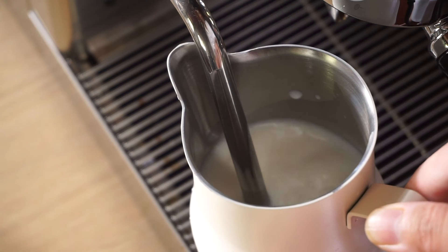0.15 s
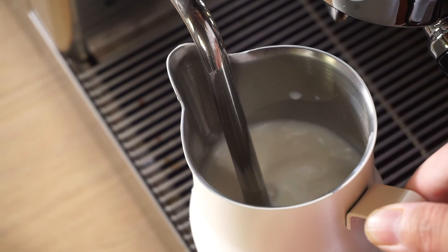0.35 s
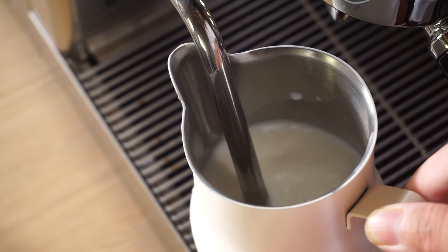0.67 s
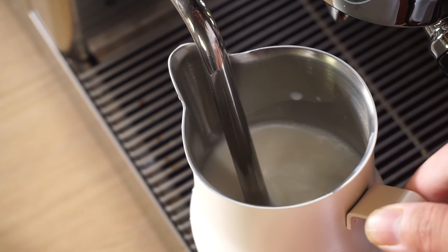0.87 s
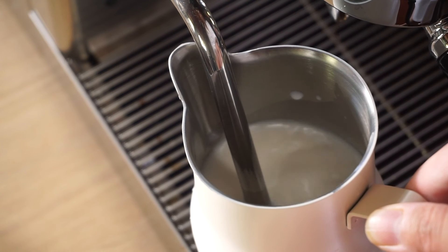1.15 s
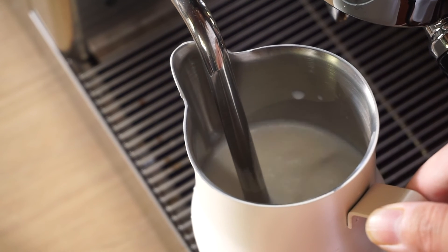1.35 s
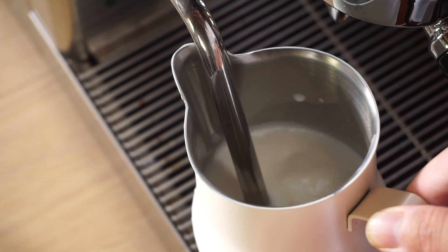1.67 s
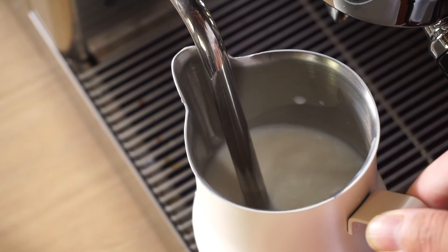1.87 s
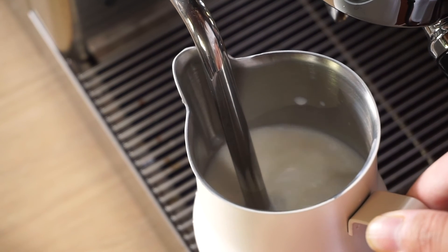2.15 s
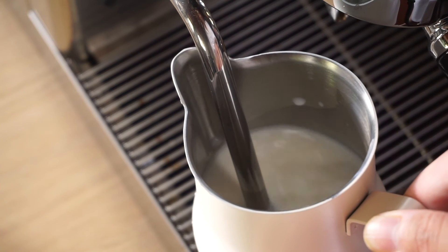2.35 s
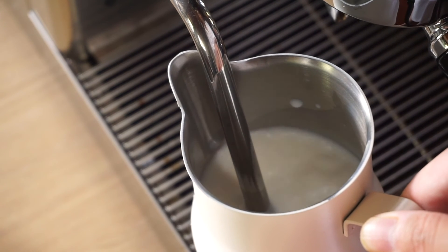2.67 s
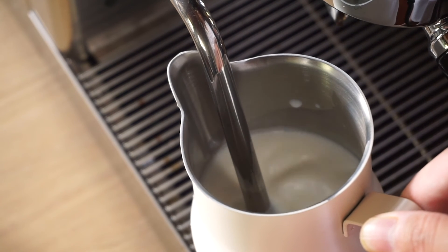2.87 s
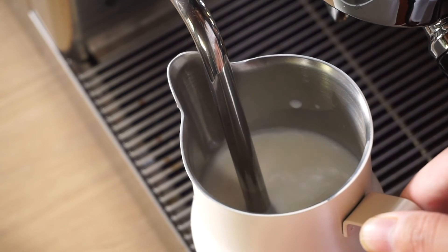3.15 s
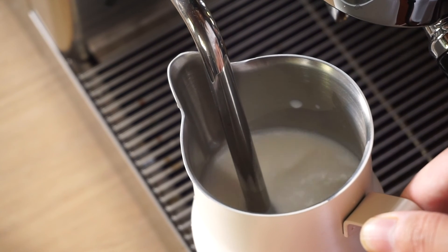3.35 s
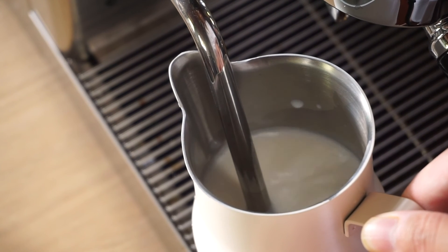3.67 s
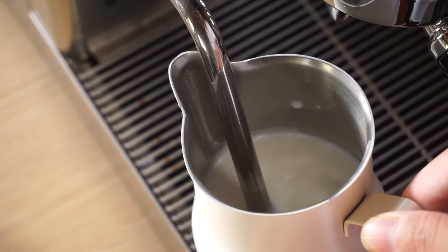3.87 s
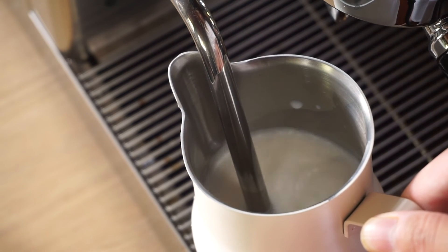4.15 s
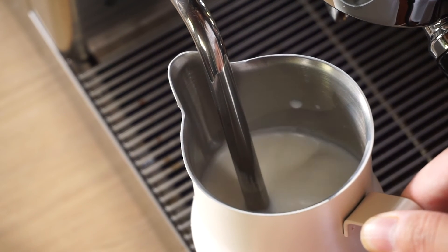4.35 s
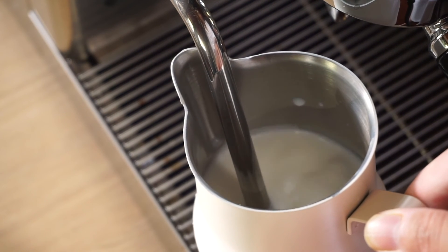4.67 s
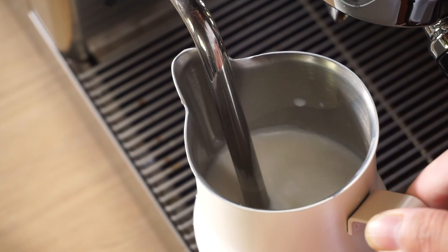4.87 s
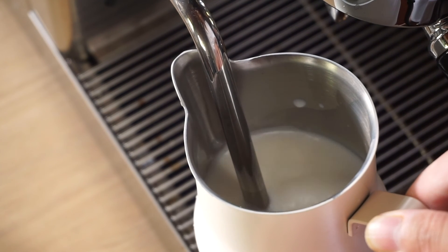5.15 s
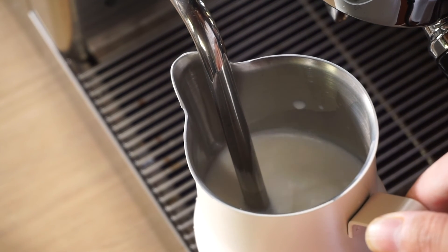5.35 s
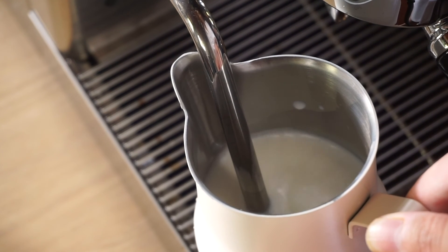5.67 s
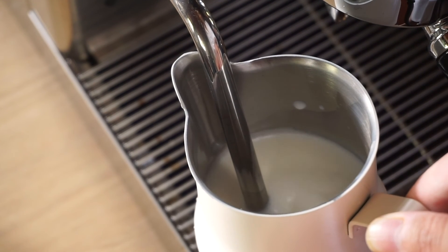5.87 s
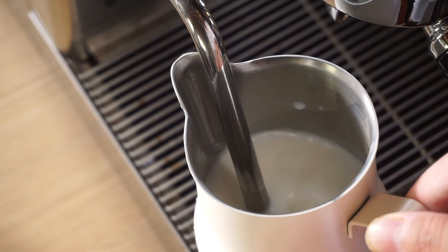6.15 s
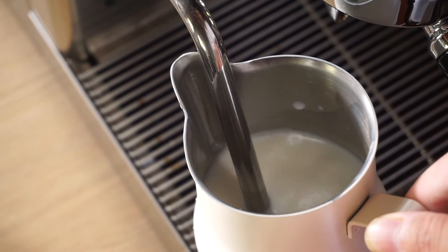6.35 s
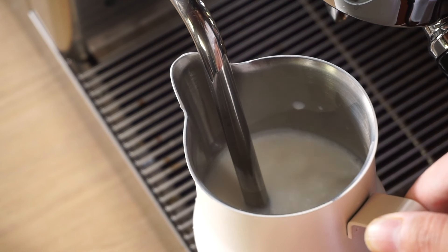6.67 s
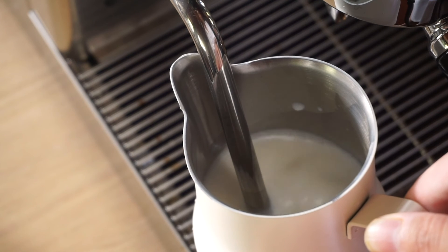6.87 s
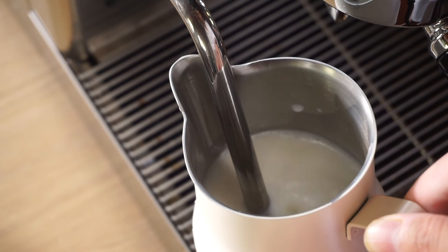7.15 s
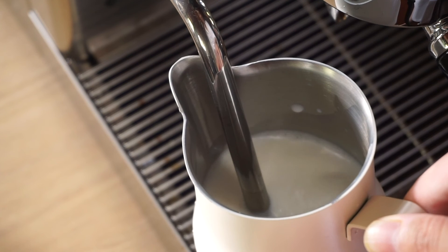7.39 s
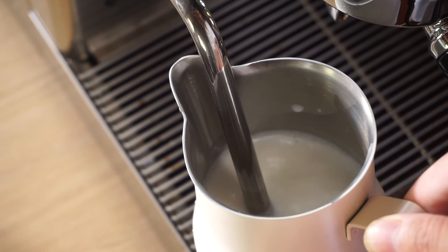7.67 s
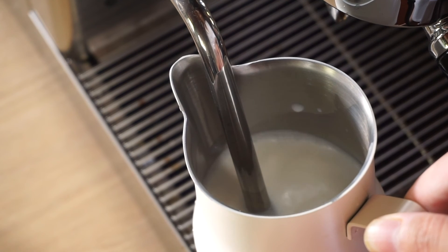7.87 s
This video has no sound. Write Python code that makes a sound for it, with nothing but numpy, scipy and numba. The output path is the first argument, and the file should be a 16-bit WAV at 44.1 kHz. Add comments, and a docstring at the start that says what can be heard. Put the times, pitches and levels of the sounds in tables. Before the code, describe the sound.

Close-up milk steaming: bright flickering hiss over a rough midrange roar, occasional bubbly gulps and pops, then sputtering spits as the jet quietens.

```python
"""In a small kitchen, a steam wand blasts into milk in a steel pitcher, close to a stereo microphone.
Noise grains for collapsing steam bubbles feed a broad roaring band and ring the milk and the pitcher;
the nozzle hisses above in flickering bands of noise. Now and then the tip gulps air (gliding sines) or
spits at the surface (choked bursts of bright noise); late on, foam lowers the milk's tones."""
import sys
import numpy as np
from scipy import signal
from scipy.fft import rfft, irfft, next_fast_len
from scipy.io import wavfile
from numba import njit

SR = 44100
rng = np.random.default_rng(int(sys.argv[2]) if len(sys.argv) > 2 else 0)


def put_to_file(sound):
    """Save the sound as 16-bit audio at rate SR, in the file named by the first command-line argument."""
    columns = np.atleast_2d(sound).T  # one column per channel
    safe = np.clip(columns, -1, 1)
    whole_steps = np.round(safe * 32767)
    wavfile.write(sys.argv[1], SR, whole_steps.astype(np.int16))


N = 353682

# kitchen and microphone floor, spectral shape: f/Hz, level/dB
FLOOR_SHAPE = [(24, -51.5), (483, -21.5), (700, -15.5), (1100, -16), (2640, -120)]
FLOOR_DB = -77.5
# stereo lean over frequency: f/Hz, left minus right/dB
STEREO_LEAN = [(600, 9), (1100, -7.5), (3500, -5), (6000, -0.5), (11000, -3.5)]
ROOM_T60_S, ROOM_DB = 0.081, 2.5
CUTOFF_HZ = 11150

# a patch of the hiss flares up: t/s, f/Hz, level/dB
HISS_FLARES = [(2.51, 5470, -44), (3.538, 7300, -38.5)]
FLARE_S, FLARE_WIDTH = 0.023, 0.45   # time from the top down to 1/e; width as a share of the pitch
# the tip spits at the surface: t/s, burst level/dB, ring level/dB
SURFACE_SPITS = [(4.556, -11.5, -30), (6.111, -17.5, -35), (6.141, -12.5, -43), (6.181, -10.5, -51),
                 (6.2116, -22, -35), (6.2372, -25, -46), (6.2635, -27, -61), (6.292, -26.5, -35),
                 (7.003, -26, -22.5), (7.025, -20.5, -30.5), (7.222, -20.5, -13.5), (7.235, -19, -29),
                 (7.256, -15, -39), (7.372, -19, -33)]
SPRAY_DB, SPRAY_S = -35, 0.05   # fizz that lingers after a spit: level against the spit, decay to 1/e
# pitcher modes: f/Hz, width/Hz, level/dB against their drive, share driven by the roar
PITCHER_MODES = [(4520, 560, -9.5, .9), (5785, 630, -13.5, 0.3), (6540, 370, -14, 0.29),
                 (3535, 240, -17, 0.33)]
# nozzle hiss, spectral shape: f/Hz, level/dB
HISS_SHAPE = [(3000, -45.5), (3900, -13.5), (5200, -6), (6500, -4.5), (8000, -1), (8500, -4), (10300, -2.5),
              (11500, -14)]

# states of the froth; each sets the milk's pitches anew, and they climb as the air mixes in:
# t/s, low f/Hz, middle f/Hz, upper f/Hz, faint f/Hz, climb/(share per s), low level/dB,
# faint level/dB against the upper, low width/(share of its pitch), change in the first pitcher mode/dB
FROTH_STATES = [(0.0, 761.3, 1575, 2383, 1370, 0.089, -71.5, -10.5, 0.14, -5),
                (2.436, 759, 1672, 2510, 1270, 0.25, -70, -22.5, 0.21, -19),
                (2.786, 754, 1644, 2565, 1320, 0.14, -76, -25, 0.27, -12.5),
                (3.411, 732.3, 1390, 2320, 1258, 0.069, -74, -20.5, 0.14, -13.5),
                (4.694, 748, 1450, 2440, 1310, 0.09, -73.5, -23.5, 0.13, -12.5),
                (6.2, 548.4, 1001, 2126, 1550, 0.0027, -81, -15, 0.29, -7)]
# how much of the climb each resonance takes: low, middle, upper, faint [share]
CLIMB_BY_TONE = (0.21, 0.96, 0.35, 0.55)
# resonance widths: middle, upper, faint [share of the pitch]
UPPER_WIDTHS = (0.23, 0.41, 0.4)
# how loud two of the resonances sing: t/s, middle level/dB, upper level/dB
SINGING = [(0.0, -65, -61.5), (1.46, -58, -64.5), (2.5, -55.5, -52), (3.5, -62, -49), (3.8, -61.5, -49),
           (4.2, -58, -55), (5.55, -69, -51.5), (5.77, -48.5, -49), (6.17, -62, -54.5), (6.3, -57, -81),
           (6.41, -85, -69), (6.5, -59, -59), (6.66, -48, -57.5), (6.95, -61.5, -51.5), (7.28, -51, -51.5),
           (7.45, -64, -47.5), (8.02, -60, -41.5)]
# narrow whistle at the heart of each resonance: low, middle, upper, faint [strength]
WHISTLE_GAINS = (0.18, 0.52, 0.25, 0.061)
WHISTLE_WIDTH = 0.22   # share of the resonance's width
UPPER_FOLLOWS = 0.77   # share of a surge's swell
# the tip gulps air: t/s, bubble level/dB, bubble f/Hz, low tone level/dB, tone hold/s
AIR_GULPS = [(0.0852, -30.5, 1860, -75, 0.029), (0.2693, -30, 1607, -39, 0.011),
             (1.9989, -31.5, 1823, -42.5, 0.031), (2.2498, -20.5, 1904, -32.5, 0.044),
             (2.2837, -21, 1835, -66, 0.033), (2.4364, -36.5, 1640, -56.5, 0.026),
             (2.4728, -37, 2300, -61, 0.0099), (2.7836, -33.5, 1640, -56, 0.023),
             (3.4103, -29, 1010, -50, 0.013), (3.4131, -27.5, 1700, -49, 0.093),
             (3.433, -30.5, 1275, -51, 0.0096), (3.602, -44, 1440, -49, 0.047),
             (3.635, -39, 2260, -49, 0.056), (3.7219, -28.5, 1430, -49.5, 0.074),
             (3.7554, -18.5, 2250, -55, 0.011), (4.69, -41, 1464, -61, 0.029),
             (4.696, -20.5, 2320, -70, 0.02), (6.2203, -38, 942, -58, 0.034), (6.27, -49, 886, -76, 0.026),
             (6.5809, -40.5, 1095, -67, 0.012), (7.0204, -36, 954, -43.5, 0.026),
             (7.2294, -32, 970, -44.5, 0.024), (7.2814, -32.5, 944, -49, 0.042)]
STIR_DB, STIR_T60_S = -33, 0.57   # the low resonance sings on after a gulp, this far under its tone
TONE_CHOKE_S = 0.02   # froth chokes a gulp's low tone to 1/e in this time
CLEAR_SHARE = 0.26   # the low tone blurs once its resonance is wider than half this share of its pitch
CRACKLE_CYCLES = 36   # small bubbles fall 60 dB within this many cycles of the big one

# the jet between surges: t/s, roar level/dB, roar centre f/Hz, hiss level/dB
STEADY_JET = [(0.0, -39.5, 2804, -42), (1.8, -43, 2908, -38.5), (2.2, -48.5, 2885, -39.5),
              (2.34, -38.5, 3164, -42.5), (2.51, -39.5, 2635, -38.5), (2.67, -38, 2980, -40.5),
              (2.87, -45.5, 2870, -43), (3.15, -35, 2680, -40), (3.45, -46.5, 2910, -40),
              (3.82, -38, 2763, -42.5), (4.3, -40.5, 2750, -39.5), (4.6, -40.5, 2880, -43),
              (5.65, -38, 2780, -39), (5.92, -39.5, 2970, -40.5), (6.14, -47, 2820, -36.5),
              (6.33, -55.5, 2760, -44), (6.55, -50, 2944, -55), (7.1, -50.5, 2870, -52.5),
              (7.6, -47, 2860, -48.5), (8.02, -41, 3050, -47.5)]
# the jet surges: t/s, length/s, swell/dB, roar centre f/Hz
JET_SURGES = [(1.676, 0.03, 6.5, 2850), (1.999, 0.064, 17.5, 3190), (3.33, 0.014, 4, 2910),
              (3.536, 0.04, 6.5, 2770), (3.966, 0.014, 8, 2800), (4.175, 0.021, 7.5, 2610),
              (4.288, 0.036, 8.5, 2705), (5.738, 0.17, 3, 3036), (6.683, 0.028, 6.5, 2780),
              (7.151, 0.021, 20.5, 2830), (7.199, 0.043, 19.5, 2890), (7.82, 0.022, 5, 3100)]
SURGE_RISE_S, SURGE_FALL_S = 0.025, 0.017
ROAR_WIDTH_HZ = 887
# the loudest single collapses in the roar: t/s, level/dB
LOUD_COLLAPSES = [(0.045, -22), (2.761, -17.5), (3.047, -22), (3.142, -22), (3.562, -15), (3.719, -18),
                  (3.958, -18), (4.166, -14.5), (4.2925, -13.5), (4.638, -19), (5.716, -15.5), (5.813, -16),
                  (7.206, -25)]


def from_db(db):
    """Decibels to gain."""
    return 10 ** (np.asarray(db) / 20)


def rms_one(x):
    """Scales to rms 1."""
    return x / np.sqrt(np.mean(x ** 2) + 1e-20)


def in_time(rows):
    """Table columns as curves, sample by sample."""
    s, *columns = np.transpose(rows)
    return [np.interp(np.arange(N) / SR, s, c) for c in columns]


def coloured(x, points, share=1):
    """Shapes a sound by f/Hz, level/dB points, joined on a logarithmic pitch scale."""
    size = next_fast_len(N)
    hz = np.maximum(np.arange(size // 2 + 1) * SR / size, 1)
    point_hz, point_db = np.transpose(points)
    db = np.interp(np.log(hz), np.log(np.maximum(point_hz, 1)), point_db)
    return irfft(rfft(x, size) * from_db(share * db), size)[..., :N]


def drift(rate_hz):
    """Slow random wander of rms 1: noise through two equal low-passes."""
    r = np.exp(-2 * np.pi * rate_hz / SR)
    wander = signal.lfilter([1], [1, -2 * r, r * r], rng.standard_normal(N + SR))
    return rms_one(wander[SR:])   # skips the filter's start


@njit
def moving_pole(x, c, r):
    """Two-pole resonance whose centre and width move."""
    y = np.zeros(len(x))
    for i in range(2, len(x)):
        drive = (1 - r[i] * r[i]) / 2 * (x[i] - x[i - 2])
        y[i] = drive + 2 * r[i] * c[i] * y[i - 1] - r[i] * r[i] * y[i - 2]
    return y


def resonance(x, hz, width_hz):
    """Gain 1 on top; three passes of the stated width leave dark valleys."""
    c = np.cos(2 * np.pi * hz / SR) + np.zeros(N)
    r = np.exp(-np.pi * width_hz / SR) + np.zeros(N)
    for _ in range(3):
        x = moving_pole(x, c, r)
    return x


def collapses(per_s, spread_db, clump_db, smooth):
    """Random bubble collapses of uneven size, in clumps, over smooth turbulence; rms 1."""
    sizes = from_db(spread_db * np.minimum(rng.exponential(1, N), 5)) * rng.choice([-1, 1], N)
    grains = rms_one(sizes * (rng.random(N) < per_s / SR))
    clumps = from_db(clump_db * (drift(19.0) + drift(36)))
    return rms_one((grains + smooth * rng.standard_normal(N)) * clumps)


def ping(hz, t60, glide, t, rise=0.00025):
    """A collapsing bubble: a quickly swelling, dying sine; a positive glide raises its pitch."""
    t = np.maximum(t, 0)
    sine = np.sin(2 * np.pi * hz * t * (1 + glide * t))
    return sine * from_db(-60 * t / t60) * (1 - np.exp(-(t / rise) ** 2))


def background_floor():
    """Faint kitchen and microphone noise: partly shared by both channels, partly opposed."""
    common, apart = rng.standard_normal((2, N))
    noise = common + 1.14 * apart * [[1], [-1]]
    return from_db(FLOOR_DB) * rms_one(coloured(noise, FLOOR_SHAPE) * from_db(3.1 * drift(7.6)))


def kitchen(x):
    """Steel, worktop and walls send back a short, bright tail, unlike in each channel."""
    t = np.arange(int(.3 * SR)) / SR
    bright = signal.lfilter([1, -0.7], [1], rng.standard_normal((2, len(t))))
    tail = bright * from_db(-60 * t / ROOM_T60_S)
    tail = tail / np.sqrt(np.sum(tail ** 2, axis=1, keepdims=True))
    return signal.fftconvolve(x[None], tail, axes=1)[:, :N]


def flares():
    """Short swells of noise, each in a band of its own."""
    s, hz, db = np.transpose(HISS_FLARES)
    t = np.arange(N) / SR
    k = np.searchsorted((s[1:] + s[:-1]) / 2, t)   # nearest flare
    band = rms_one(resonance(collapses(6000, 2.0, 0.67, smooth=2.7), hz[k], FLARE_WIDTH * hz[k]))
    return from_db(db[k]) * np.exp(-((t - s[k]) / FLARE_S) ** 2) * band


def spits():
    """Each spit swells for some milliseconds and is choked off; it also shakes a pitcher mode."""
    bright, ring, t = np.zeros(N), np.zeros(N), np.arange(N) / SR
    for s, db, ring_db in SURFACE_SPITS:
        late = t - s - .003   # from the top of the spit
        bright += from_db(db - 12) * np.exp(np.where(late < 0, late / 0.0076, -late / 0.00051))
        bright += from_db(db + SPRAY_DB) * (late > 0) * np.exp(-np.abs(late) / SPRAY_S)
        ring += from_db(ring_db - 13.5) * np.exp(np.where(late < 0, late / 0.0013, -late / 0.018))
    drive = collapses(4700, 2.5, 1.5, smooth=0.73)
    burst = bright * rms_one(resonance(drive, 8920, 3400))
    return burst + ring * rms_one(resonance(drive, PITCHER_MODES[1][0], 500))


def froth():
    """The froth table's columns, sample by sample; the first is the time since the state began."""
    t, rows = np.arange(N) / SR, np.array(FROTH_STATES)
    s, *columns = rows[np.maximum(np.searchsorted(rows[:, 0], t) - 1, 0)].T
    return [t - s] + columns


def pitcher_ring(hiss_db, roar_db):
    """Modes rung by collapses, following hiss and roar; each froth state sets the first, near 4.5 kHz."""
    out, drive = 0, collapses(4300, 6.3, 1.1, smooth=1.0)
    changes_db = [froth()[-1], 0, 0, 0]
    for (hz, width_hz, db, share), change_db in zip(PITCHER_MODES, changes_db):
        ring = rms_one(resonance(drive, hz * from_db(0.12 * drift(4.0)), width_hz))
        driven_db = (1 - share) * hiss_db + share * roar_db
        out = out + from_db(db + change_db + driven_db + 2.4 * drift(3.5)) * ring
    return out


def hiss(level_db):
    """Nozzle hiss: noise in patches that flicker band by band, duller when weak."""
    out, edges = 0, np.geomspace(3500, 12500, 8)
    for low, high in zip(edges, edges[1:]):
        band = signal.butter(2, [low, high], "band", fs=SR, output="sos")
        tilt_db = 0.91 * np.minimum(level_db + 42.5, 0) * np.log2(low / 7000)
        flicker_db = 0.66 * drift(2.47) + 1.42 * drift(6.0) + 3.3 * drift(44)
        out = out + signal.sosfilt(band, rng.standard_normal(N)) * from_db(tilt_db + flicker_db)
    return from_db(level_db - 5.5) * rms_one(coloured(out, HISS_SHAPE))


def milk_tones(swell_db):
    """Pitches, widths and levels of four resonances: pitches reset at each froth state;
    gulps stir the low one, surges the upper and faint."""
    t = np.arange(N) / SR
    since, *tones_hz, climb, low_db, faint_db, low_width, _ = froth()
    pitches = [hz * (1 + share * climb * since) * from_db(0.098 * drift(7.2))
               for hz, share in zip(tones_hz, CLIMB_BY_TONE)]
    stirred = np.zeros(N)
    for start, _, _, tone_db, _ in AIR_GULPS:
        i = int(start * SR)
        stirred[i:i + SR] += from_db(tone_db + STIR_DB - 60 * t[:min(SR, N - i)] / STIR_T60_S)
    mid_db, upper_db = in_time(SINGING)
    upper = from_db(upper_db + UPPER_FOLLOWS * swell_db)
    gains = (from_db(low_db) + stirred, from_db(mid_db), upper, upper * from_db(faint_db))
    return pitches, (low_width, *UPPER_WIDTHS), gains


def singing_milk(pitches, widths, gains):
    """Turbulence keeps four resonances of the milk singing, each with a narrow whistle at its heart."""
    out = 0
    for hz, share, gain, whistle in zip(pitches, widths, gains, WHISTLE_GAINS):
        drive = collapses(1500, 2.9, 1.4, smooth=0.71)
        ringing = resonance(resonance(drive, hz, share * hz), hz, share * hz)
        ringing = rms_one(ringing / np.sqrt(share * hz))
        ringing = ringing + whistle * rms_one(resonance(ringing, hz, WHISTLE_WIDTH * share * hz))
        out = out + gain * from_db(2.4 * drift(2.0)) * rms_one(ringing)
    return out


def gulps(low_hz, low_width):
    """A big bubble's ping, a crackle of small ones, and a low milk tone that blurs in a wide resonance."""
    out, t = np.zeros(N), np.arange(int(.2 * SR)) / SR
    chance = rng.random((len(AIR_GULPS), 28, 3))   # delay, pitch and size of the small bubbles
    width_hz = low_width * low_hz
    shaken = resonance(collapses(900, 2.1, 1.5, smooth=0.5), low_hz, width_hz) / np.sqrt(width_hz)
    for (s, db, hz, tone_db, hold), small in zip(AIR_GULPS, chance):
        i = int(s * SR)
        crackle = 0
        for u, v, w in small:   # later ones tend to be weaker
            bubble = ping(hz * 2.23 ** (v - .3), CRACKLE_CYCLES / hz, 4.4, t - 0.06 * u * u, rise=0.0013)
            crackle = crackle + from_db(-14 * u - 16 * w) * bubble
        clear = np.clip(2 - 2 * low_width[i] / CLEAR_SHARE, 0.4, 1)
        blurred = rms_one(shaken[i:i + len(t)]) * (1 - np.exp(-t / 0.0005))
        tone = clear * ping(low_hz[i], 1.0, 0, t, rise=0.0034) + (1 - 0.88 * clear) * blurred
        tone = tone * np.exp(-np.maximum(t - hold, 0) / TONE_CHOKE_S)
        pop = 1.1 * ping(hz, 0.035, 0.36, t, rise=0.0012) + 0.62 * crackle
        out[i:i + len(t)] += from_db(db) * pop + from_db(tone_db) * tone
    return out


def milk(swell_db):
    """The milk's singing resonances, and the gulps that shake the low one."""
    pitches, widths, gains = milk_tones(swell_db)
    return singing_milk(pitches, widths, gains) + gulps(pitches[0], widths[0])


def surges(steady_hz):
    """Swell in dB (rise, hold, fall) and the roar's centre, drawn to each surge's pitch."""
    t = np.arange(N) / SR
    swell_db, hz = np.zeros(N), steady_hz.copy()
    for s, length, db, centre_hz in JET_SURGES:
        rise = (t - s) / SURGE_RISE_S + 1
        fall = (s + length - t) / SURGE_FALL_S + 1
        shape = np.clip(np.minimum(rise, fall), 0, 1)
        swell_db += db * shape
        hz += shape * (centre_hz - hz)
    return swell_db, hz


def roar(level_db, hz):
    """The bubble cloud at the tip rings in one broad, wandering band with a sharp lower edge."""
    drive = collapses(2500, 4.3, 1.1, smooth=0.84)
    broad = rms_one(resonance(drive, hz * from_db(0.24 * drift(15.0)), ROAR_WIDTH_HZ))
    whistle = rms_one(resonance(rng.standard_normal(N), hz * (1 + 0.054 * drift(5.95)), 270))
    cloud = broad + 0.75 * whistle * from_db(1.8 * drift(4.2))
    lower_edge = signal.cheby2(8, 40, 2100, "high", fs=SR, output="sos")
    out = from_db(level_db) * rms_one(signal.sosfilt(lower_edge, cloud))
    t = np.arange(int(.05 * SR)) / SR
    for s, db in LOUD_COLLAPSES:
        i = int(s * SR)
        out[i:i + len(t)] += from_db(db + 5.0) * ping(hz[i], 0.024, 2.2, t, rise=0.0052)
    return out


def scene():
    """Pitcher and room, leaning left or right by frequency, over a faint floor."""
    steady_db, steady_hz, hiss_db = in_time(STEADY_JET)
    swell_db, roar_hz = surges(steady_hz)
    roar_db = steady_db + swell_db
    pitcher = flares() + spits() + pitcher_ring(hiss_db, roar_db) + hiss(hiss_db)
    pitcher = pitcher + milk(swell_db) + roar(roar_db, roar_hz)
    bass_cut = signal.cheby2(8, 50, 400, "high", fs=SR, output="sos")   # too small to radiate bass
    pitcher = signal.sosfilt(bass_cut, pitcher)
    left, right = pitcher + from_db(ROOM_DB) * kitchen(pitcher)
    leaning = [coloured(left, STEREO_LEAN, share=.5), coloured(right, STEREO_LEAN, share=-.5)]
    return np.array(leaning) + background_floor()


def record(dry):
    """The top is cut steeply."""
    return signal.sosfilt(signal.ellip(14, .5, 80, CUTOFF_HZ, fs=SR, output="sos"), dry)


dry = scene()
out = record(dry)
put_to_file(out)
```